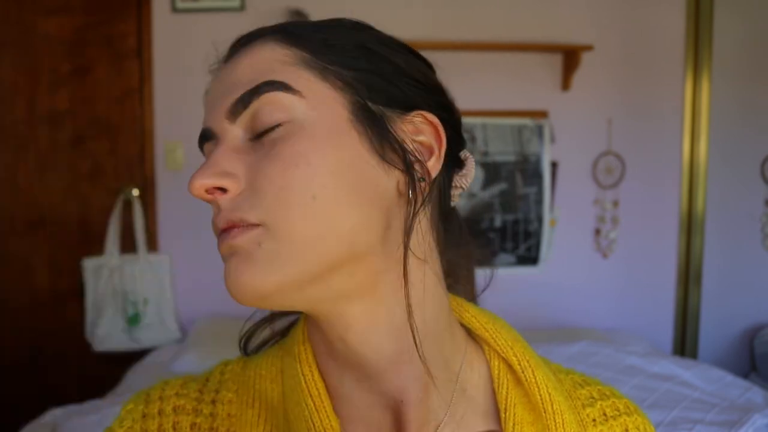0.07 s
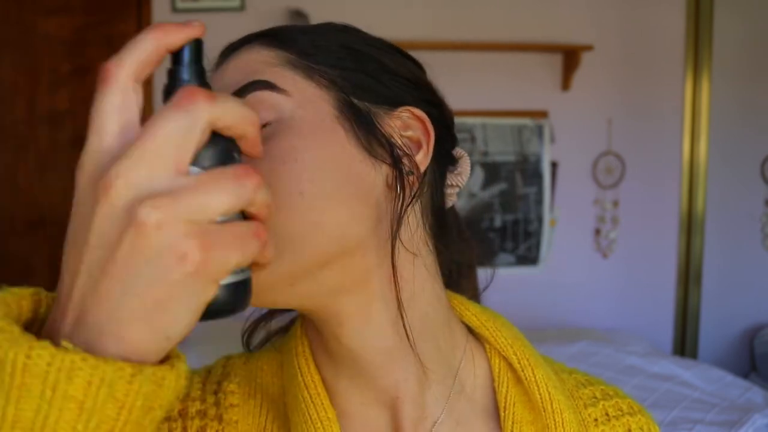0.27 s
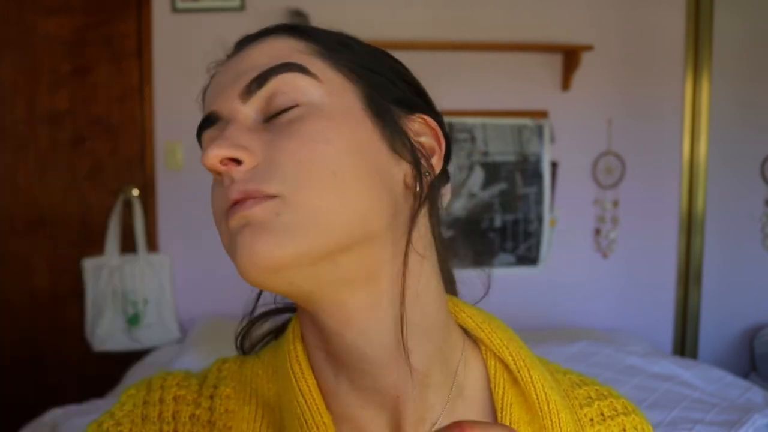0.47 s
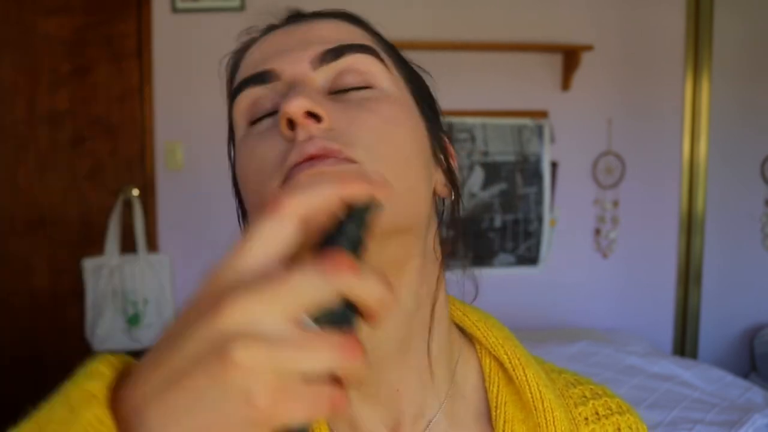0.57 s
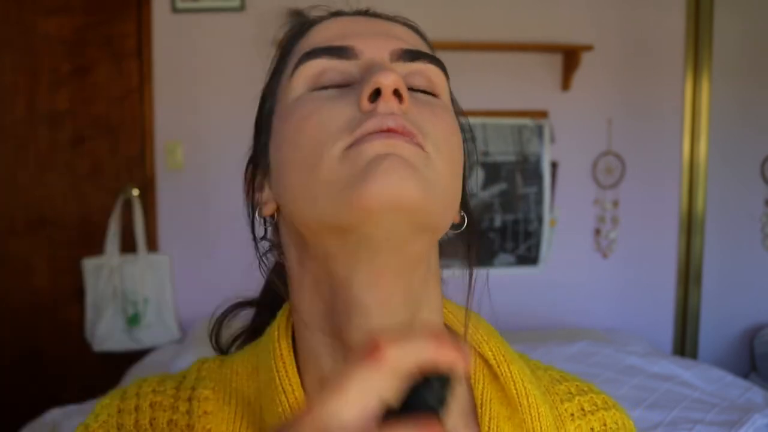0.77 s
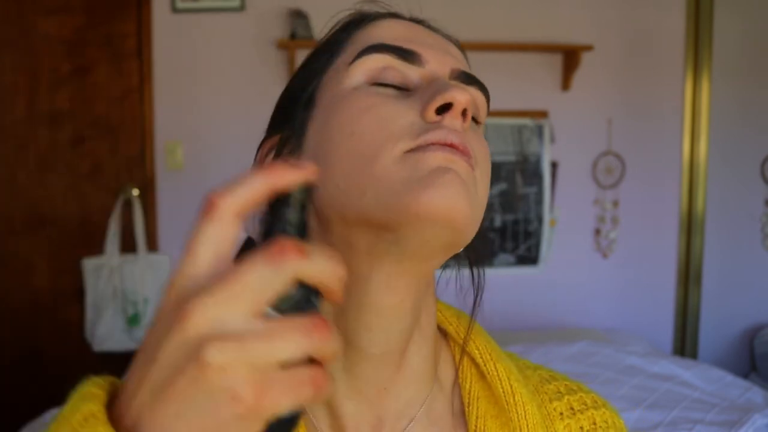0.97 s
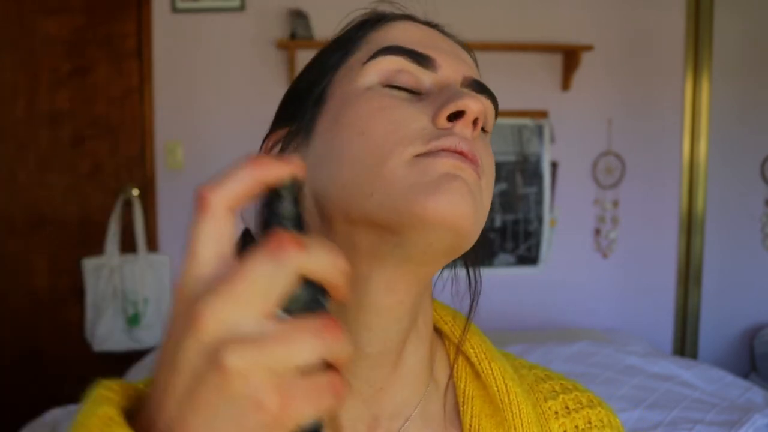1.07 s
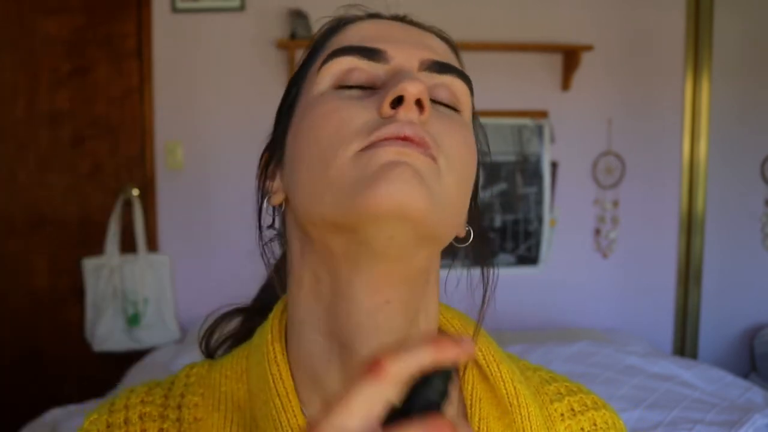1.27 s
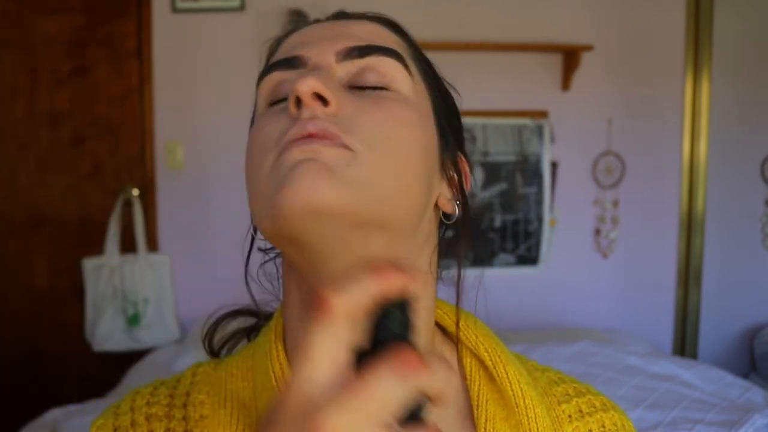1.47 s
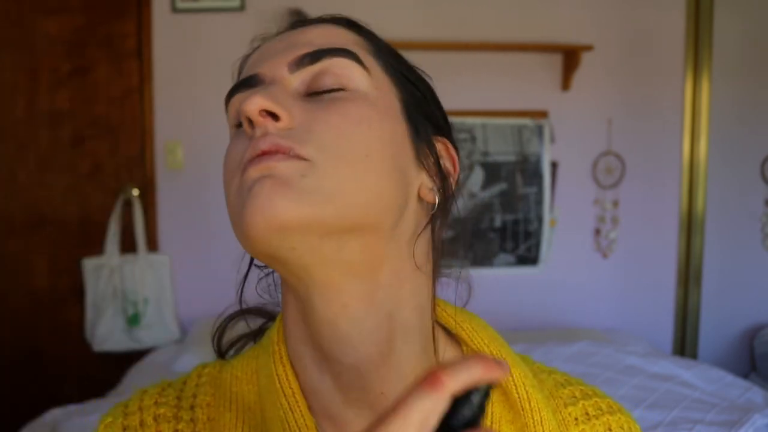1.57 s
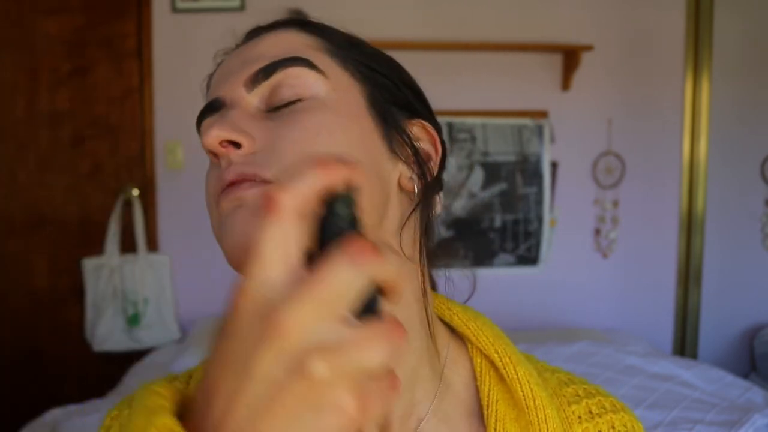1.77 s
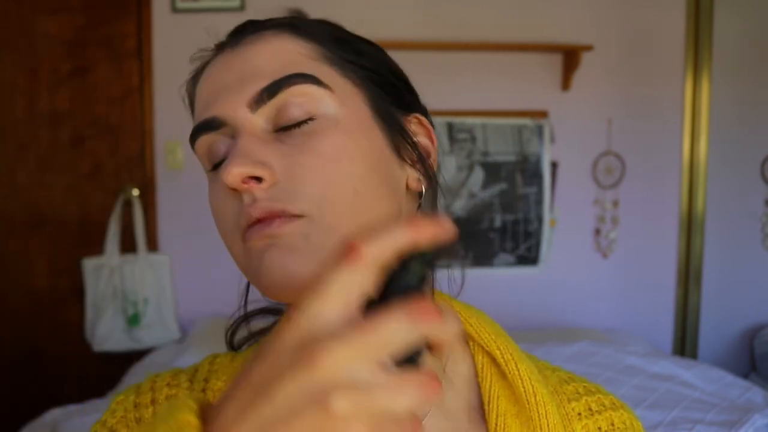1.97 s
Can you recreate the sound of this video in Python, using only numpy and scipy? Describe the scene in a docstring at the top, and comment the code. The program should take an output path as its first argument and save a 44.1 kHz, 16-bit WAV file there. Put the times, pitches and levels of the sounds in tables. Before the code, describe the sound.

Six short bursts of mist hiss from a pump spray bottle, close by and slightly to the right. Between them come light plastic clicks and the slosh and glug of the swung bottle, over a quiet room's faint rumble.

```python
"""A small pump bottle sprays six times, close by and a little to the right, in a quiet bedroom.
Each stroke: the plunger ticks, the nozzle hisses a swell of mist, the pump refills with a wet crackle.
The bottle is swung between strokes: small bubbles slosh, large air pockets glug and knock on its wall.
The room rings briefly over a low rumble and a weak hum."""
import sys
import numpy as np
from scipy import signal
from scipy.fft import rfft, irfft
from scipy.io import wavfile

SR = 44100
rng = np.random.default_rng(int(sys.argv[2]) if len(sys.argv) > 2 else 0)


def wav_record(signal):
    """Record a signal, one row per channel, as 16-bit PCM in the file named by sys.argv[1]."""
    frames = np.transpose(np.atleast_2d(signal))
    bounded = np.clip(frames, -1, 1)
    # unit amplitude maps onto the largest positive 16-bit level
    quanta = np.round(bounded * 32767).astype(np.int16)
    wavfile.write(sys.argv[1], SR, quanta)


N = 88817
TIME_S = np.arange(N) / SR
LIQUID_PAN_DB, LIQUID_LAG_MS = -3.2, 0.076
PUMP_PAN_DB, PUMP_LAG_MS, PUMP_ROOM_DB = -3.5, -0.018, -4


def undb(db):
    """Decibels to gain."""
    return 10 ** (np.asarray(db) / 20)


def unit(x):
    """Scale to rms 1."""
    return x / np.sqrt(np.mean(x ** 2))


def decay(t, t60_s):
    """Exponential fade, 60 dB down at t60_s."""
    return np.exp(-np.log(1000) * t / t60_s)


def add(out, start_s, x):
    """Mix x in at start_s."""
    i = int(np.clip(start_s * SR, 0, N - 1))
    out[i:i + len(x)] += x[:N - i]


def cut(x, hz, kind, order=2):
    """Low-pass or high-pass."""
    return signal.sosfilt(signal.butter(order, hz, kind, fs=SR, output="sos"), x)


def band(x, hz, width_hz):
    """Broad resonance."""
    return signal.lfilter(*signal.iirpeak(hz, hz / width_hz, fs=SR), x)


def colour(x, curve):
    """Filter by (freq_hz, gain_db) rows; rms 1."""
    hz, db = np.array(curve).T
    bins_hz = np.maximum(np.fft.rfftfreq(N, 1 / SR), 1)
    gain = undb(np.interp(np.log(bins_hz), np.log(hz), db))
    return unit(irfft(rfft(x) * gain, N))


def wide_noise(curve, spread):
    """Coloured stereo noise; spread is side over mid."""
    mid, side = (colour(rng.standard_normal(N), curve) for _ in range(2))
    return unit(mid + spread * side * np.array([[1], [-1]]))


def ring(modes):
    """Decaying modes of a struck object."""
    t = np.arange(SR // 10) / SR
    return sum(undb(db) * np.sin(2 * np.pi * hz * t) * decay(t, t60_s) for hz, db, t60_s in modes)


def swells(rows):
    """Gaussian envelopes, summed in power."""
    bells = (undb(db) * np.exp(-((TIME_S - centre_s) / sigma_s) ** 2 / 2)
             for centre_s, sigma_s, db in rows)
    return np.sqrt(sum(bell ** 2 for bell in bells))


def room_echo(mono):
    """Stereo room tail: treble dies first, bass is alike in both ears."""
    bass_t60_s, treble_t60_s, split_hz = 0.31, 0.24, 4940
    gap_s, wide_above_hz = 0.0028, 1110
    t = np.arange(SR // 2) / SR
    bass = cut(rng.standard_normal((2, len(t))), split_hz, "low") * decay(t, bass_t60_s)
    treble = cut(rng.standard_normal((2, len(t))), split_hz, "high") * decay(t, treble_t60_s)
    tail = (bass + treble) * (t > gap_s)
    mid, side = tail / np.sqrt(np.sum(tail ** 2))
    side = cut(side, wide_above_hz, "high")
    return signal.fftconvolve(mono[None], np.array([mid + side, mid - side]), axes=1)[:, :N]


def place(x, pan_db, lag_ms, room_db):
    """Direct sound plus room; pan and lag are left relative to right."""
    left, right = x * np.ones((2, 1))
    delay = np.exp(-2j * np.pi * np.fft.rfftfreq(N, 1 / SR) * lag_ms / 1000)
    late_left = irfft(rfft(left) * delay, N)
    direct = np.array([late_left * undb(pan_db / 2), right * undb(-pan_db / 2)])
    return direct + undb(room_db) * room_echo((left + right) / 2)


# Noise floor spectrum: freq_hz, gain_db
FLOOR_SPECTRUM = [(20, -41.5), (42, 8.5), (60, 0.5), (85, 2), (110, 1.5), (170, -1), (270, 3), (450, 1),
                  (900, -24.5), (2500, -28.5), (6000, -13), (16000, -33)]
# Rumble spectrum: freq_hz, gain_db
RUMBLE_SPECTRUM = [(25, -25), (45, -25), (62, 8), (82, -6.5), (105, -16), (160, -7.5), (300, -22),
                   (2000, -70)]
# Rumble swells: centre_s, sigma_s, level_db
RUMBLE_SWELLS = [(.4, 0.16, -49.5), (.8, 0.17, -53), (1.39, 0.083, -55)]


def room_tone(floor_db=-50, hum_hz=81.6, hum_db=-62, spread=0.44):
    """Steady low noise with faint hiss, a swelling rumble and a weak hum."""
    hum = undb(hum_db) * np.sqrt(2) * np.sin(2 * np.pi * (hum_hz * TIME_S + rng.random()))
    floor = undb(floor_db) * wide_noise(FLOOR_SPECTRUM, spread)
    rumble = swells(RUMBLE_SWELLS) * wide_noise(RUMBLE_SPECTRUM, spread)
    return floor + rumble + hum


def bubble(start_hz, decay_ms, rise_per_ms, attack_ms=0.39):
    """An air pocket rings for a few cycles, rising in pitch, and closes."""
    t_ms = np.arange(SR // 30) * 1000 / SR
    pitch_hz = start_hz * (1 + rise_per_ms * t_ms)
    envelope = (1 - np.exp(-(t_ms / attack_ms) ** 2)) * np.exp(-(t_ms / decay_ms) ** 2)
    return envelope * np.sin(2 * np.pi * np.cumsum(pitch_hz) / SR)


# Filter on the bubble swarm: freq_hz, gain_db
SLOSH_FILTER = [(150, -9), (330, -13), (520, 4.5), (740, 0), (870, -6), (1050, 5), (1350, 1), (1650, 6),
                (2200, -3), (2800, 10.5), (4500, 41)]
# Sloshes at the turns of the hand: centre_s, sigma_s, level_db
SLOSH_SWELLS = [(.125, 0.067, -41.5), (.36, 0.036, -40), (.49, 0.055, -41.5), (.735, 0.035, -40.5),
                (.895, 0.062, -42), (1.095, 0.036, -42), (1.27, 0.054, -40), (1.40, .055, -39.5),
                (1.59, 0.014, -39), (1.80, 0.039, -47.5), (1.925, 0.049, -40.5)]


def slosh(bubbles_per_s=1200, low_hz=383.5, high_hz=2512, decay_cycles=5.25, scatter_db=6.5):
    """A swarm of small bubbles, heard through the bottle, swells with each swing."""
    swarm = np.zeros(N)
    for when, pitch, strength in rng.random((int(bubbles_per_s * N / SR), 3)):
        hz = low_hz * (high_hz / low_hz) ** pitch
        level_db = scatter_db * np.sqrt(-2 * np.log(1 - strength))
        blip = bubble(hz, decay_ms=1000 * decay_cycles / hz, rise_per_ms=0.036)
        add(swarm, when * N / SR, hz * undb(level_db) * blip)
    envelope = swells(SLOSH_SWELLS) + undb(-65)  # the liquid never quite settles
    return place(colour(swarm, SLOSH_FILTER) * envelope, LIQUID_PAN_DB, LIQUID_LAG_MS, room_db=-8.5)


# Modes of the part-filled bottle: freq_hz, gain_db, t60_s
BOTTLE_MODES = [(543, -12, .04), (654, -3.5, 0.021), (800, -9, 0.046), (1012, 3, 0.026), (1142, -5, 0.047),
                (1444, -6.5, 0.054), (1850, -21.5, 0.084), (2068, -2.5, 0.055), (3270, -2.5, 0.023)]
# Collapsing air pockets: start_s, level_db, pitch_hz, decay_ms, knock_db
GLUGS = [(0.095, -25.5, 1970, 2.5, -58), (0.107, -27.5, 1600, 3.4, -59), (0.1262, -19.5, 2220, 2.9, -61),
         (0.309, -32, 1020, 2.8, -42.5), (.337, -24.5, 1440, 1.7, -41), (0.3753, -27, 1260, 2.1, -41),
         (.477, -23, 1670, 2.4, -64), (.5200, -3.5, 2140, 0.82, -21), (0.5211, -8, 1900, 1.8, -30),
         (0.525, -19, 2210, 2.8, -38), (.702, -39, 1550, 1.5, -36.5), (.719, -27, 980, 1.3, -39),
         (.768, -26, 1430, 2.8, -33), (.864, -24, 1650, 1.8, -53), (0.9046, -18, 2010, 1.2, -29.5),
         (1.2461, -17, 1680, 1.1, -43), (1.2538, -9.5, 1325, 1.68, -28.5), (1.2558, -17, 1830, 2.5, -39),
         (1.2652, -22, 1035, 3.6, -29), (1.365, -21.5, 2400, 1.7, -43), (1.6113, -0.5, 1705, 2.29, -23.5),
         (1.6129, -16.5, 1020, 4.6, -33.5), (1.758, -31.5, 2430, 2.1, -47), (1.783, -30.5, 1380, 4.6, -40),
         (1.9597, -16, 1520, 2.6, -64), (1.9619, -3.5, 1850, 0.58, -22.5)]


def glugs(detune=0.034, scatter_db=1.5, knock_top_hz=3350, low_cut_hz=356):
    """Large air pockets collapse and knock on the wall, whose modes shift as the liquid moves."""
    out = np.zeros(N)
    for start_s, level_db, pitch_hz, decay_ms, knock_db in GLUGS:
        modes = [(hz * (1 + detune * rng.standard_normal()), db + scatter_db * rng.standard_normal(), t60_s)
                 for hz, db, t60_s in BOTTLE_MODES]
        rise_per_ms = 0.067 + 0.11 * undb(level_db)  # strong pockets close faster
        add(out, start_s, undb(level_db) * bubble(pitch_hz, decay_ms, rise_per_ms))
        add(out, start_s, undb(knock_db) * cut(ring(modes), knock_top_hz, "low"))
    radiated = cut(out, low_cut_hz, "high")  # a small bottle radiates no bass
    return place(radiated, LIQUID_PAN_DB, LIQUID_LAG_MS, room_db=-6.5)


# Wet crackle spectrum: freq_hz, gain_db
CRACKLE_SPECTRUM = [(400, -8), (1500, -3), (3200, 5), (5000, -2.5), (7800, 2), (11000, -4.5), (16000, -16)]
# Pump refills: centre_s, sigma_s, level_db
REFILL_SWELLS = [(.172, 0.023, -36), (.565, 0.02, -40), (.966, .028, -36), (1.325, 0.028, -41.5),
                 (1.665, 0.075, -49.5), (2.0, 0.058, -51)]


def refill(pops_per_s=1500, scatter_db=5.5):
    """Dense wet crackle as the plunger comes back up."""
    impulses = (rng.random(N) < pops_per_s / SR) * rng.choice([-1, 1], N)
    pops = impulses * undb(scatter_db * rng.standard_normal(N))
    crackle = colour(pops, CRACKLE_SPECTRUM) * swells(REFILL_SWELLS)
    return place(crackle, PUMP_PAN_DB, PUMP_LAG_MS, PUMP_ROOM_DB)


# Modes of the plastic pump head: freq_hz, gain_db, t60_s
HEAD_MODES = [(2200, -21.5, 0.018), (3450, -5.5, 0.0071), (5150, -13, 0.005), (7360, -16, 0.0057),
              (11000, -17, .004)]
# Plunger ticks: start_s, level_db, pitch_hz
PLUNGER_TICKS = [(0.2713, -27, 7400), (0.277, -34, 3270), (.319, -27, 6960), (0.375, -18.5, 3160),
                 (.5525, -28, 4700), (.569, -27.5, 8000), (0.67, -26.5, 8850), (.6808, -25, 4430),
                 (.6815, -16, 11400), (0.957, -24, 7420), (1.014, -38, 7500), (1.029, -31, 9300),
                 (1.051, -50, 9000), (1.071, -25.5, 8300), (1.3146, -22.5, 8900), (1.33, -25, 5200),
                 (1.396, -23, 3500), (1.399, -18.5, 6350), (1.406, -27, 6800), (1.654, -28.5, 8400),
                 (1.7505, -32, 3640), (1.7808, -30, 4900), (2.007, -30.5, 3120)]


def plunger_ticks(top_hz=11800):
    """The plunger catches and lets go: a tiny crack, and the plastic head rings."""
    out = np.zeros(N)
    head = ring(HEAD_MODES)
    fade = decay(np.arange(len(head)) / SR, t60_s=0.008)
    for start_s, level_db, pitch_hz in PLUNGER_TICKS:
        crack = band(rng.standard_normal(len(head)) * fade, pitch_hz, width_hz=0.22 * pitch_hz)
        add(out, start_s, undb(level_db) * (crack / np.abs(crack).max() + head))
    return place(cut(out, top_hz, "low", order=4), PUMP_PAN_DB, PUMP_LAG_MS, PUMP_ROOM_DB)


# Mist jet spectrum: freq_hz, gain_db
JET_SPECTRUM = [(300, -25), (900, -27.5), (1700, -16), (3100, -1.5), (4000, -3), (4900, -5), (6000, 0.5),
                (7400, 1.5), (8800, 2), (10200, 0), (12400, -2), (14000, -5.5), (16000, -13)]
# Pump strokes: start_s, rise_s, fall_s, level_db, breath_offset_db
STROKES = [(-.07, 0.039, 0.12, -28.5, -8.5), (0.311, 0.065, 0.11, -30, -3), (.692, 0.081, 0.099, -29, -5),
           (1.06, 0.054, 0.12, -30, -2.5), (1.406, 0.085, 0.087, -31.5, -2), (1.766, 0.06, 0.12, -34, -6)]


def mist(breath_db=-10, attack_power=1.47, release_power=2.15):
    """The nozzle hisses, with a breathy midrange, as finger pressure builds and fades."""
    jet = wide_noise(JET_SPECTRUM, spread=0.42)
    breath = unit(band(rng.standard_normal(N), hz=2290, width_hz=1900))
    out = np.zeros((2, N))
    for start_s, rise_s, fall_s, level_db, breath_offset_db in STROKES:
        age_s = TIME_S - start_s
        attack = np.sin(np.pi / 2 * np.clip(age_s / rise_s, 0, 1)) ** attack_power
        release = np.exp(-(np.maximum(age_s - rise_s, 0) / fall_s) ** release_power)
        hiss = jet + undb(breath_db + breath_offset_db) * breath
        out += undb(level_db) * attack * release * hiss
    return place(out, pan_db=-2.5, lag_ms=PUMP_LAG_MS, room_db=-7.5)


def scene():
    """Room, pump and liquid, in stereo."""
    return room_tone() + mist() + glugs() + refill() + plunger_ticks() + slosh()


def record(dry, top_hz=15900):
    """Clip at full scale, then low-pass steeply."""
    low_pass = signal.ellip(10, 0.2, 80, top_hz, fs=SR, output="sos")
    return signal.sosfilt(low_pass, np.clip(dry, -1, 1))


dry = scene()
out = record(dry)
wav_record(out)
```